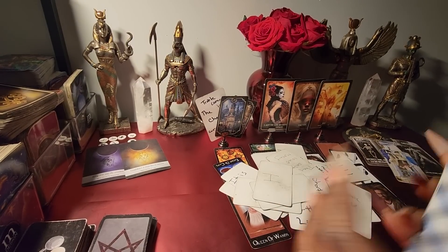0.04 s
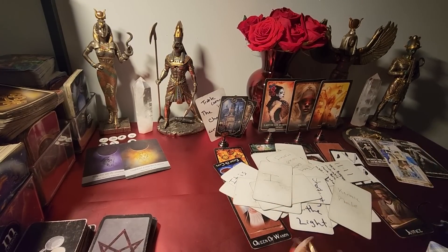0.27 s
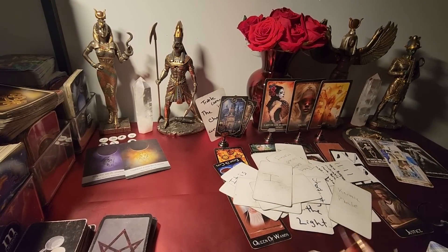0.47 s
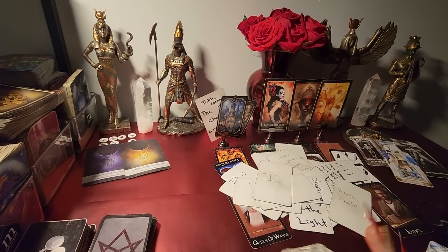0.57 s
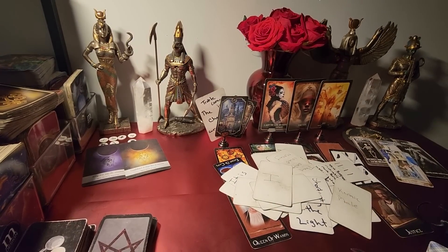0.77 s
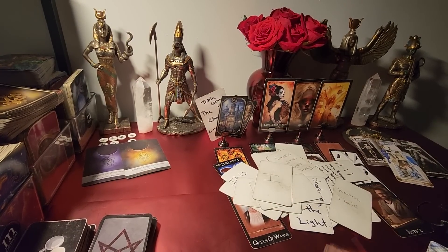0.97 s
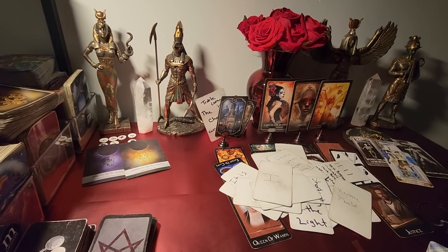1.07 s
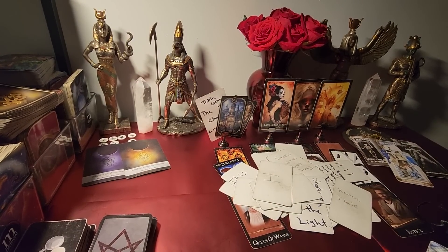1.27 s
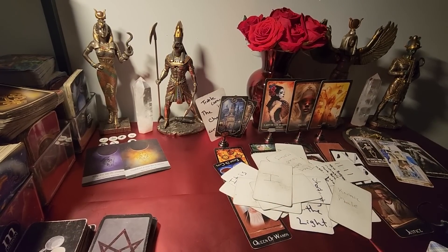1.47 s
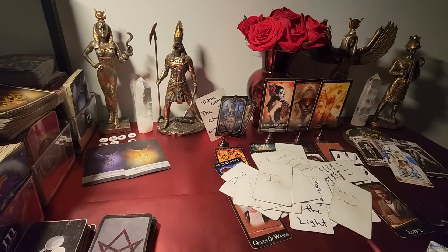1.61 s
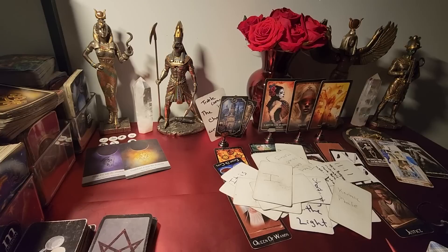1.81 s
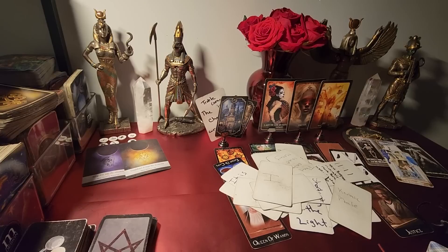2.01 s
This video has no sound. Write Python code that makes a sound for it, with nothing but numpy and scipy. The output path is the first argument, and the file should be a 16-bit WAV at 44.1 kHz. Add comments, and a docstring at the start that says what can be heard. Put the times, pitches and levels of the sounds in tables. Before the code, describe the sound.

Close stereo microphone in a small bare room: soft rustle and a tiny card tick, then a sharp flat slap of cards on a table, ringing briefly, followed by quiet handling over low rumble and hiss.

```python
"""A small, bare room heard through two microphone ports: low rumble, changing hiss and faint hum throughout.
First a hand rustles and a card ticks: enveloped noise. At 0.21 s a deck of cards is slapped onto a
cloth-covered table: its edge lands, it falls flat, the last cards snap down. Table modes thump, bursts
of noise crack, things on the table ring as decaying sines and the room answers with banded noise tails.
Afterwards the hand rustles on, with faint card ticks and soft taps."""
import sys
import numpy as np
from scipy import signal
from scipy.fft import rfft, irfft
from scipy.io import wavfile

SR = 44100
rng = np.random.default_rng(int(sys.argv[2]) if len(sys.argv) > 2 else 0)


def wav_record(signal):
    """Record a signal, one row per channel, as 16-bit PCM in the file named by sys.argv[1]."""
    frames = np.transpose(np.atleast_2d(signal))
    bounded = np.clip(frames, -1, 1)
    # unit amplitude maps onto the largest positive 16-bit level
    quanta = np.round(bounded * 32767).astype(np.int16)
    wavfile.write(sys.argv[1], SR, quanta)


N = 90404  # length [samples]

# Noise colours are relative: each noise is scaled to rms 1 before its level is set.
# colour of the room's background: (frequency [Hz], density [dB per Hz])
BACKGROUND_COLOUR = [(15, -41), (25, -9), (59, -2), (86, -7.5), (119, -1.5), (144, -1.5), (183, -3.5),
                     (204, -15), (246, -8), (331, -19.5), (359, -17), (523, -24.5), (598, -23.5),
                     (648, -27), (762, -23), (1110, -29.5), (1490, -29.5), (1800, -34.5), (2230, -29.5),
                     (3000, -44.5), (3260, -42), (5730, -51.5), (15500, -79)]
# hiss in the background over time: (time [s], level relative to the rumble's gain [dB])
HISS_LEVELS = [(0, 8), (.2, 3.5), (0.599, 1.5), (0.848, -0.5), (1.3, 2), (1.55, 3), (2.05, 4)]
# faint steady tones in the background: (frequency [Hz], rms level [dB])
HUM_TONES = [(120, -60), (770, -77), (1001, -75.5), (2180, -84.5), (8328, -94)]
BACKGROUND_DB, HISS_ABOVE_HZ = -48.5, 300
RIPPLE_DB, RIPPLE_SPACING_HZ = 3, 23.3  # room modes make the background's spectrum uneven

# strokes of the hand and sleeve: (centre time [s], level [dB], half length [s])
HAND_STROKES = [(0.033, -59, 0.056), (0.2, -53, 0.081), (0.544, -63.5, 0.089), (0.692, -63, 0.042),
                (0.844, -65, .025), (0.909, -64, 0.024), (0.983, -65, .04), (1.09, -63, 0.048),
                (1.519, -67, 0.085), (1.734, -65, 0.086), (1.812, -68, 0.013), (1.865, -66, 0.027),
                (1.993, -63.5, 0.072)]
# colour of the rustle: (frequency [Hz], density [dB per Hz])
RUSTLE_COLOUR = [(1000, 8), (3500, 1), (7000, -0.5), (8400, 3), (9600, -7.5), (15500, -8)]
RUSTLE_GRAIN_DB, RUSTLE_GRAIN_S = 1.5, 0.012
# faint ticks of handled cards: (time [s], level [dB], decay [s])
CARD_TICKS = [(0.155, -59, 0.0041), (0.4268, -43, .005), (0.6637, -66, .004), (0.6898, -53.5, 0.0044),
              (0.8313, -55.5, 0.0018), (1.0795, -57, 0.0041), (1.0825, -55.5, .006), (1.085, -55, .006),
              (1.1, -64, 0.0065), (1.6287, -58.5, 0.0018), (1.8395, -58.5, 0.0025), (1.9557, -57.5, .004)]
# colour of a tick and of its room tail: (frequency [Hz], density [dB per Hz])
TICK_COLOUR = [(300, -13), (1500, -12.5), (4000, -4.5), (8300, -1), (12000, -7), (15500, -11)]
TICK_ROOM_DB = -11.5  # tail level relative to each tick
# soft taps of fingers and cards: (time [s], level [dB], pitch [Hz], decay [s])
SOFT_TAPS = [(0.6902, -57, 330, .012), (1.079, -49, 340, .014), (1.5135, -51, 1600, .007)]
# colour of a tap: (frequency [multiple of the pitch], density [dB per Hz])
TAP_COLOUR = [(.25, -19), (.7, -1), (1, 2), (1.8, -9), (5, -50), (20, -37)]

# colour of the room's answer to the slap: (frequency [Hz], density [dB per Hz])
ROOM_COLOUR = [(40, -25), (120, -6.5), (230, -13.5), (350, -10.5), (550, -9), (1000, -11.5), (1400, -5),
               (1900, -9.5), (2600, -4.5), (3300, -16), (5000, -15.5), (6800, -21), (8000, -27),
               (10000, -35), (15500, -41.5)]
# time for the room's tail to fall by 60 dB: (frequency [Hz], t60 [s])
ROOM_DECAY = [(80, 0.75), (250, 0.4), (700, .44), (1150, 0.49), (1600, 0.55), (2100, .49), (2900, 0.44),
              (5000, .47), (8000, 0.36), (14000, 0.47)]
ROOM_DB, ROOM_BUILD_S = -13, .008
# hollows and resonances of the cluttered corner: (centre [Hz], half width [Hz], gain [dB])
CORNER_COLOUR = [(356, 40, -1), (530, 22, -9.5), (675, 90, 0), (697, 14, -5), (796, 50, 4), (1176, 91, 9.5),
                 (1586, 75, 6), (2020, 70, -6.5), (2250, 130, 7.5), (2900, 120, 3.5), (3010, 30, 4.5),
                 (4020, 60, -3), (4510, 120, 7.5), (4900, 80, -11.5), (5450, 150, 7), (7440, 130, 7.5),
                 (9550, 150, -7), (11485, 250, 2.5)]

# sharp rings of the things on the table: (frequency [Hz], relative level [dB], t60 [s])
OBJECT_RINGS = [(1136, -7, .4), (1190, -3, .45), (1226, -5, .5), (1262, -3, .45), (1530, -7, .55),
                (1596, -4, .55), (2138, 0, .4), (2241, -3, .42), (2318, 0, .4), (2530, -7, .38),
                (2875, -7, .3), (3009, -8, .28), (4505, -12, .42), (5420, -15, .42)]
RINGS_DB = -23
# edge lands, deck falls flat in three steps, last cards snap: (time [s], push on the table [dB])
DECK_LANDINGS = [(0.2077, -2.6), (0.2112, -.2), (0.2160, -.8), (0.2211, -8.1), (0.2276, -22)]
# the air at each landing: (crack level [dB], decay [s], dull above [Hz], room level [dB])
AIR_CRACKS = [(-16, .007, 6000, -19.5), (-9.5, .006, 3800, -8.5), (-13, .008, 2000, -9.5),
              (-14.5, .006, 1800, -14.5), (-10.5, .007, 13000, -1)]
# colour of the cracks: (frequency [Hz], density [dB per Hz])
CRACK_COLOUR = [(200, -22.5), (500, -14.5), (900, 0.5), (1300, -12.5), (1800, 0.5), (2300, -3), (3200, -16),
                (4500, -8), (6500, -18.5), (9000, -23), (15000, -24.5)]
CRACK_RISE_S, CRACK_SPREAD = 0.00018, 0.83  # spread: scattered amplitude relative to direct
# modes of the table and the deck on it: (frequency [Hz], level relative to the push [dB], t60 [s])
TABLE_MODES = [(66, -19, .327), (72, -18, .418), (84, -23, .29), (131, -17, .489), (175, -14, .055),
               (218, -23, .042), (233, -32, .46), (453, -26, .183), (472, 4, .004), (626, -29, .182),
               (816, -14, .029), (868, -33, .299)]
PUSH_RISE_S, CLOTH_HZ = .00025, 1800  # the cloth softens the knock above CLOTH_HZ

# likeness of the two microphone ports in noise: (frequency [Hz], correlation [-1..1])
PORT_LIKENESS = [(50, .99), (125, .97), (250, .88), (500, .6), (1000, -.05), (2000, 0), (15000, 0)]
# balance of the slap between the ports: (frequency [Hz], left over right [dB])
SLAP_BALANCE = [(60, .7), (200, 1.3), (700, .6), (1300, .3), (2400, -.9), (4400, -2.3), (8000, -.2),
                (13000, 1.6)]
PORT_LAG_S = .0003
LOW_CUT_HZ, TOP_HZ = 39, 15850  # the recorder's pass band


def undb(db):
    """Turn decibels into an amplitude factor."""
    return 10 ** (np.asarray(db) / 20)


def on_log(points, hz):
    """Read (frequency [Hz], value) points on a log-frequency axis."""
    p = np.array(points, float)
    return np.interp(np.log(np.maximum(hz, 1)), np.log(p[:, 0]), p[:, 1])


def freqs():
    """Frequency of every spectral bin [Hz]."""
    return np.arange(N // 2 + 1) * SR / N


def since(start):
    """Seconds since a moment, zero before it."""
    return np.maximum(np.arange(N) / SR - start, 0)


def burst(start, rise, decay):
    """Envelope with a quick rise and an exponential fall."""
    age = since(start)
    return (1 - np.exp(-age / rise)) * np.exp(-age / decay)


def dull(hz):
    """Gain of a gentle low-pass at every frequency."""
    return 1 / np.hypot(1, (freqs() / hz) ** 2)


def noise(colour, dull_hz=None):
    """Stereo noise of a given colour, rms 1, alike at both ports in the bass."""
    gain = undb(on_log(colour, freqs()))
    if dull_hz:
        gain = gain * dull(dull_hz)
    like = np.clip(on_log(PORT_LIKENESS, freqs()), -1, 1)
    mid, side = rfft(rng.standard_normal((2, N)))
    # the balance of mid and side sets the correlation of left and right
    mid = mid * np.sqrt(1 + like)
    side = side * np.sqrt(1 - like)
    out = irfft(gain * np.array([mid + side, mid - side]), N)
    return out / out.std()


def ports(x):
    """Direct sound reaches the left microphone port first, the right one a lag later."""
    sample = np.arange(N)
    late = np.interp(sample - PORT_LAG_S * SR, sample, x)
    return np.array([x, late])


def mode(start, hz, t60, phase=0):
    """One resonance with a short rise, falling by 60 dB in t60."""
    envelope = burst(start, PUSH_RISE_S, t60 / np.log(1000))
    return envelope * np.sin(2 * np.pi * hz * since(start) + phase)


def reverberate(colour, hits):
    """The room's tail after (time [s], level [dB]) hits: it builds up, then each band dies at its own rate."""
    spectrum = rfft(noise(colour))
    centres = [hz for hz, _ in ROOM_DECAY]
    out = 0
    for share, (_, t60) in zip(np.eye(len(ROOM_DECAY)), ROOM_DECAY):
        # overlapping bands whose gains add up to one
        band = irfft(spectrum * on_log(list(zip(centres, share)), freqs()), N)
        decay = t60 / np.log(1000)
        # tails of separate hits add in power
        power = sum((undb(db) * burst(start, ROOM_BUILD_S, decay)) ** 2 for start, db in hits)
        out = out + band * np.sqrt(power)
    return out


def background():
    """Low rumble and a slowly changing hiss, made uneven by the room's modes, with a faint hum."""
    chance = rng.standard_normal(N // 2)
    ripple = np.interp(freqs() / RIPPLE_SPACING_HZ, np.arange(N // 2), chance)
    ripple = ripple * np.minimum(freqs() / 500, 1)  # less uneven below 500 Hz
    air = rfft(noise(BACKGROUND_COLOUR)) * undb(RIPPLE_DB * ripple)
    rumble = irfft(air * dull(HISS_ABOVE_HZ), N)
    hiss = irfft(air, N) - rumble
    hiss = hiss * undb(np.interp(since(0), *np.transpose(HISS_LEVELS)))
    hum = sum(undb(db) * np.sqrt(2) * np.sin(2 * np.pi * hz * since(0)) for hz, db in HUM_TONES)
    return undb(BACKGROUND_DB) * (rumble + hiss) + ports(hum)


def hand_rustle():
    """Hand and sleeve rub in smooth strokes: coloured noise with a random grain in its level."""
    t = np.arange(N) / SR
    chance = np.interp(t / RUSTLE_GRAIN_S, np.arange(N), rng.standard_normal(N))
    grain = undb(RUSTLE_GRAIN_DB * chance)
    strokes = sum(undb(db) * np.exp(-((t - centre) / half) ** 2) for centre, db, half in HAND_STROKES)
    return noise(RUSTLE_COLOUR) * grain * strokes


def card_ticks():
    """Handled cards tick: short bursts of noise, each with a tail from the room."""
    envelope = sum(undb(db) * burst(start, 0.00017, decay) for start, db, decay in CARD_TICKS)
    tail = reverberate(TICK_COLOUR, [(start, db + TICK_ROOM_DB) for start, db, _ in CARD_TICKS])
    return noise(TICK_COLOUR) * envelope + tail


def soft_taps():
    """Fingers and cards tap softly: bursts of noise centred near each tap's pitch."""
    out = 0
    for start, db, pitch, decay in SOFT_TAPS:
        colour = [(multiple * pitch, density) for multiple, density in TAP_COLOUR]
        out = out + undb(db) * noise(colour) * burst(start, 0.00028, decay)
    return out


def slap_room():
    """The bare room answers every landing with a decaying, coloured tail."""
    hits = [(start, room_db) for (start, _), (_, _, _, room_db) in zip(DECK_LANDINGS, AIR_CRACKS)]
    return undb(ROOM_DB) * reverberate(ROOM_COLOUR, hits)


def corner(x):
    """Colour a sound with the cluttered corner's resonances and hollows."""
    db = sum(peak * np.exp(-((freqs() - hz) / width) ** 2) for hz, width, peak in CORNER_COLOUR)
    return irfft(rfft(x) * undb(db), N)


def object_rings():
    """Things on the table ring on as decaying modes once the deck starts to land flat."""
    start = DECK_LANDINGS[1][0]
    # each port hears every ring at its own phase
    phases = rng.uniform(0, 2 * np.pi, (len(OBJECT_RINGS), 2, 1))
    rings = sum(undb(db) * mode(start, hz, t60, phase)
                for (hz, db, t60), phase in zip(OBJECT_RINGS, phases))
    return undb(RINGS_DB) * rings


def air_cracks():
    """Air squeezed from under the cards cracks at each landing; nearby things scatter it."""
    out = 0
    for (start, _), (db, decay, dull_hz, _) in zip(DECK_LANDINGS, AIR_CRACKS):
        direct = ports(noise(CRACK_COLOUR, dull_hz)[0])
        scattered = CRACK_SPREAD * noise(CRACK_COLOUR, dull_hz)
        air = (direct + scattered) / np.hypot(1, CRACK_SPREAD)
        out = out + undb(db) * burst(start, CRACK_RISE_S, decay) * air
    return out


def table_thump():
    """Each landing pushes the table top away and its modes knock, softened by the cloth."""
    knock = 0
    for start, push in DECK_LANDINGS:
        for hz, db, t60 in TABLE_MODES:
            # minus: the table top moves away
            knock = knock - undb(push + db) * mode(start, hz, t60, np.pi / 2)
    return ports(irfft(rfft(knock) * dull(CLOTH_HZ), N))


def scene():
    """The background, the small handling sounds, and the slap in its room."""
    handling = hand_rustle() + card_ticks() + soft_taps()
    slap = table_thump() + object_rings() + corner(air_cracks() + slap_room())
    lean_db = on_log(SLAP_BALANCE, freqs()) / 2
    slap = irfft(rfft(slap) * undb([lean_db, -lean_db]), N)
    return background() + handling + slap


def record(dry):
    """The recorder drops the deepest bass, clips at full scale and cuts the top."""
    low_cut = signal.butter(4, LOW_CUT_HZ, "high", fs=SR, output="sos")
    top_cut = signal.ellip(10, .1, 70, TOP_HZ, fs=SR, output="sos")  # ripple, stop band [dB]
    thin = signal.sosfilt(low_cut, dry)
    return signal.sosfilt(top_cut, np.clip(thin, -1, 1))


dry = scene()
out = record(dry)
wav_record(out)
```